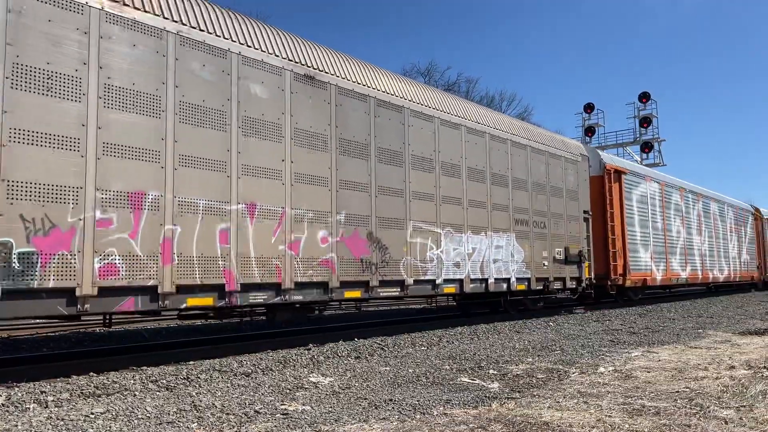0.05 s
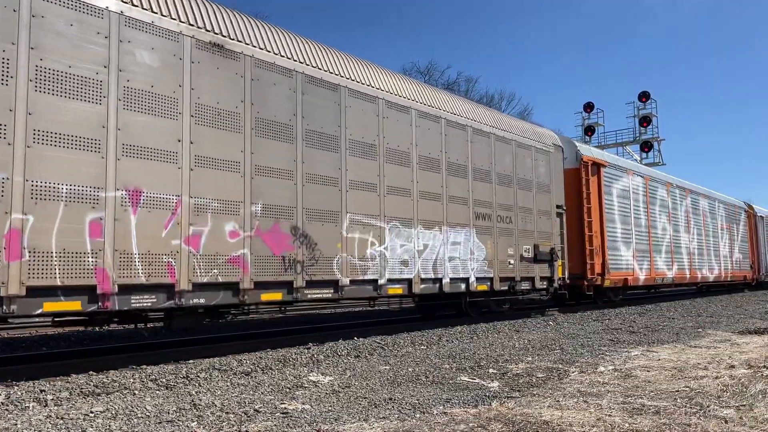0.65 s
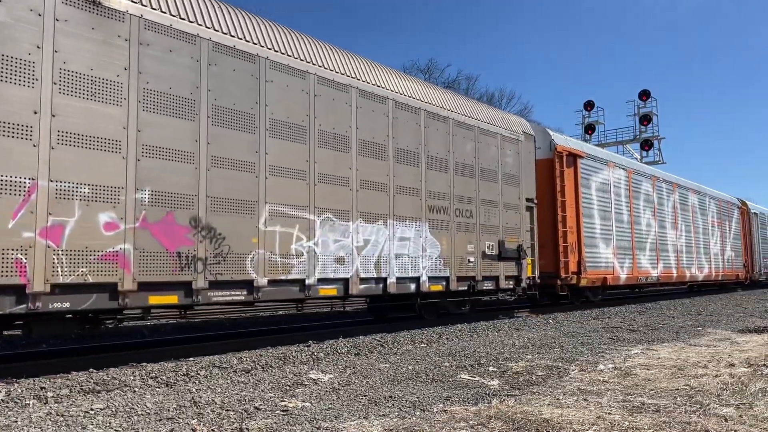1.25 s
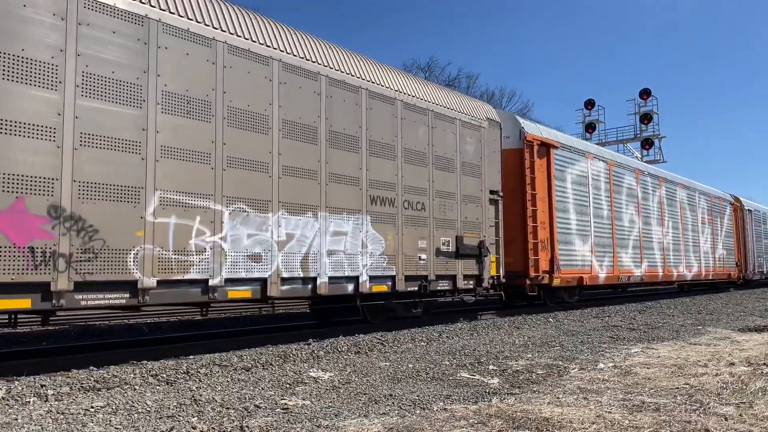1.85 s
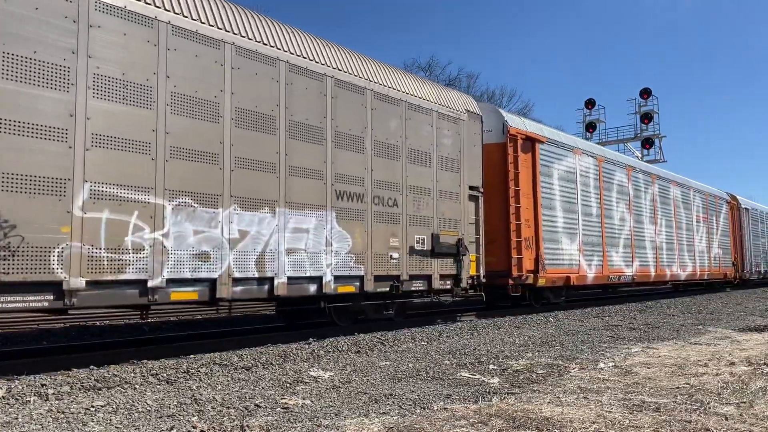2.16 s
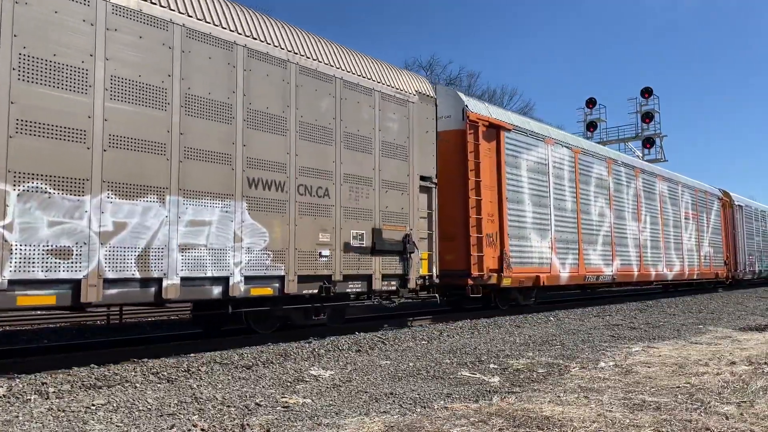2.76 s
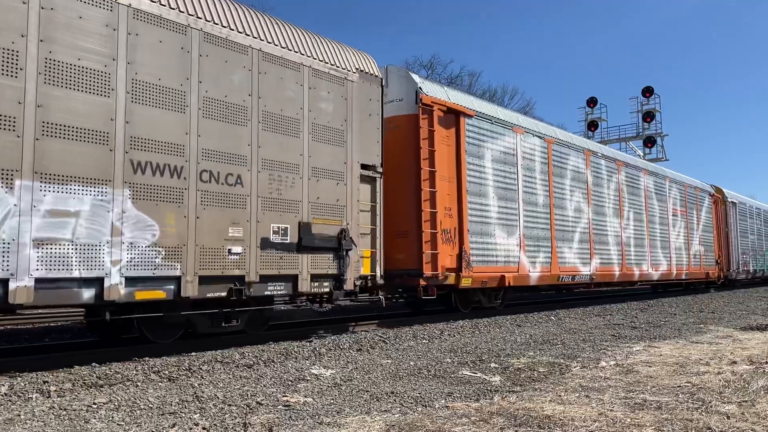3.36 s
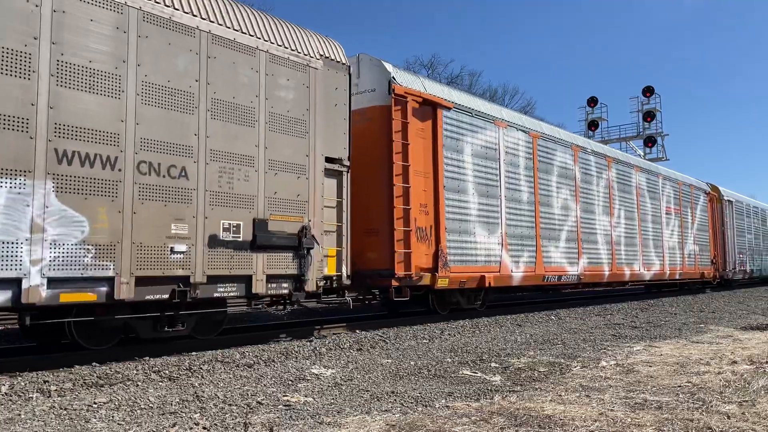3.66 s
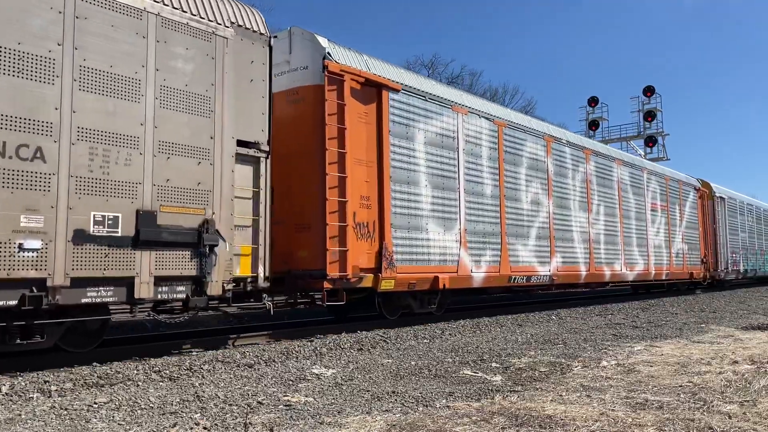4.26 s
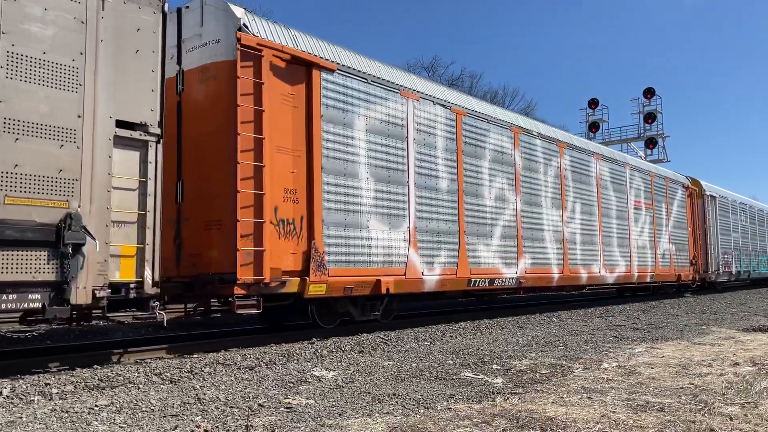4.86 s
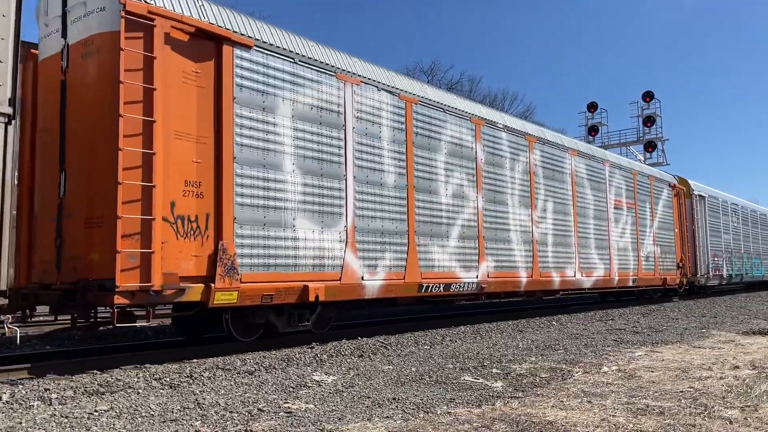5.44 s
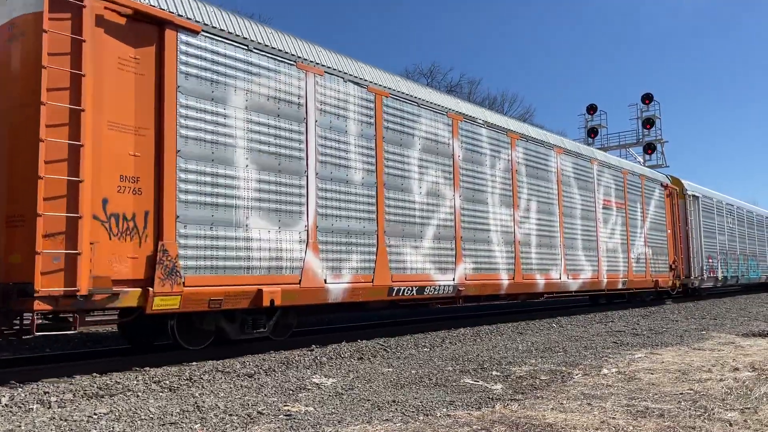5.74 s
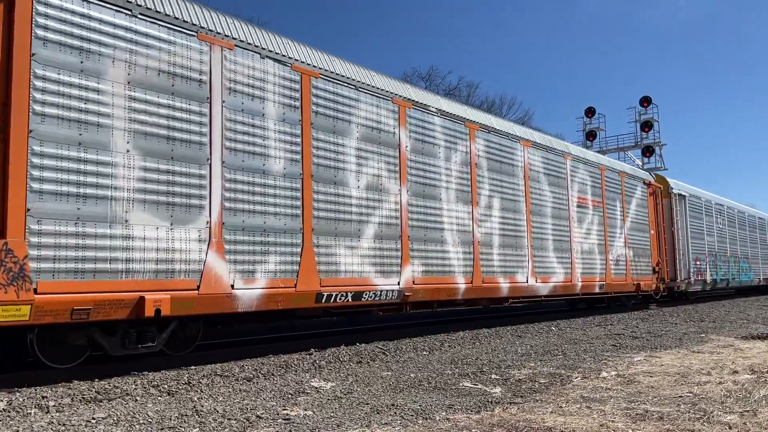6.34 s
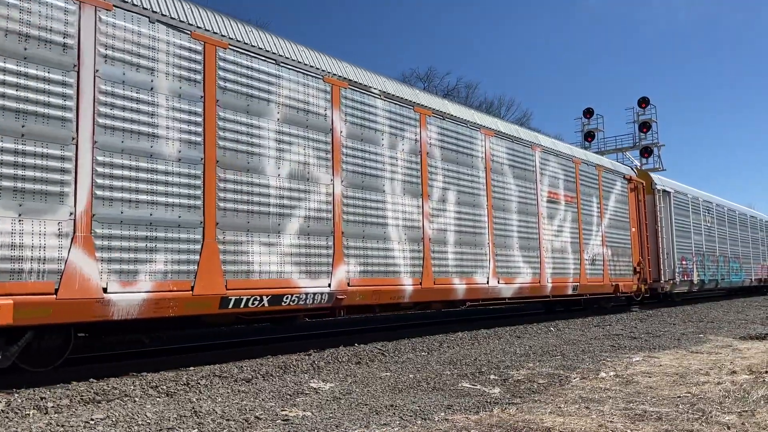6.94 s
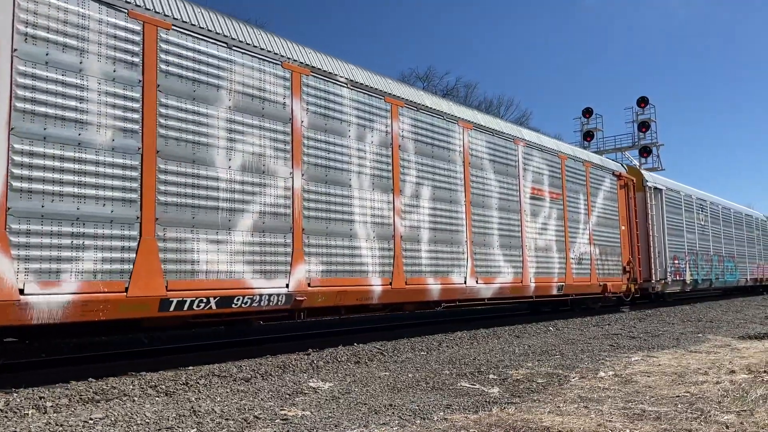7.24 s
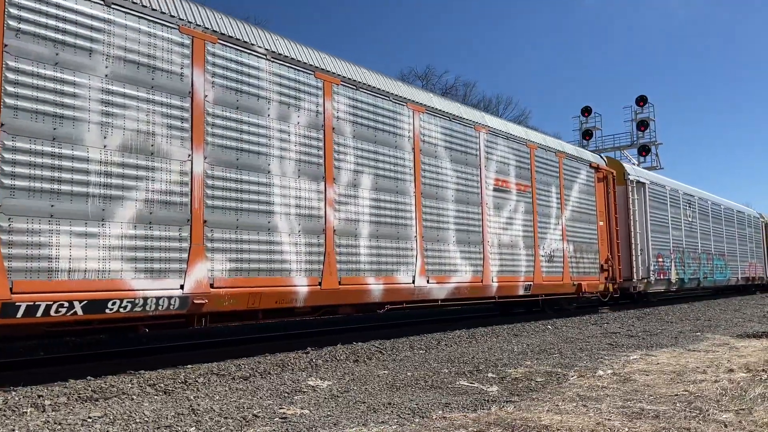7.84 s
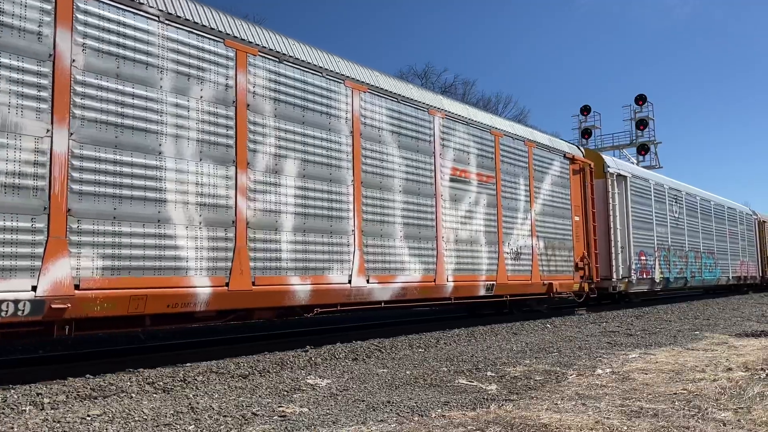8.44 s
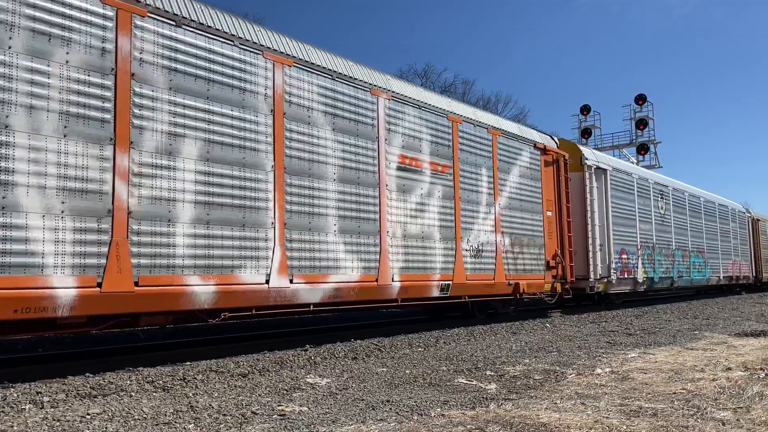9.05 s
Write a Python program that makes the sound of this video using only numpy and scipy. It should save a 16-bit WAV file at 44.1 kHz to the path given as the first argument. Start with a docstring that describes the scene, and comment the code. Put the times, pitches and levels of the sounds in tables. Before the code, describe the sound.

Heard in stereo from the trackside, a slow freight train keeps up a deep, steady rumble. A set of steel wheels passes at once with a hissing roar and ringing clanks on a rail joint. The sound eases to rumble, faint ticks, short squeaks and distant grinding. Past the middle, and again near the end, more wheels swell close and strike the joint, with dull booms from the wagon panels.

```python
"""A freight train of tall car carriers rolls slowly past, a few metres from a phone beside the ballast.
Wagon bodies rumble throughout. A bogie roars and hisses by at once; its wheels clank over a rail joint
and ring. Loose fittings tick, flanges chirp on the rail, panels boom. From 2 to 5 s wheels grind further
up the track. More wheels hit the joint from 5.5 s and from 8 s, as further bogies come abreast.
The train is heard from one side, in stereo."""
import sys
import numpy as np
from scipy import signal
from scipy.fft import rfft, irfft, next_fast_len
from scipy.io import wavfile

SR = 44100
rng = np.random.default_rng(int(sys.argv[2]) if len(sys.argv) > 2 else 0)


def store_pcm(level_fs):
    """Save levels as 16-bit WAV."""
    pcm = np.round(np.clip(level_fs, -1, 1) * 32767).astype(np.int16)
    wavfile.write(sys.argv[1], SR, np.atleast_2d(pcm).T)


N = 405719
TIME = np.arange(N) / SR
FFT_SIZE = next_fast_len(N + 8192)
FREQ = np.arange(FFT_SIZE // 2 + 1) * SR / FFT_SIZE
DIRECT_ONLY = np.array([[1], [0]])  # signal rows: direct, scattered

# noise spectra: (frequency [Hz], relative density [dB])
RUMBLE_SPECTRUM = [(18, -38), (30, -18), (45, -4.5), (62, 1.5), (100, -1.5), (150, -12.5), (260, -19),
                   (600, -86)]
DRONE_SPECTRUM = [(80, -4.5), (130, 5), (190, 2), (245, 4), (310, 3), (380, 1), (500, -8.5), (900, -55)]
ROAR_SPECTRUM = [(220, -5), (420, 1.5), (600, 2.5), (850, -1), (1200, -4), (1650, -13.5), (2300, -17.5),
                 (5000, -43.5)]
HISS_SPECTRUM = [(900, 0), (1500, 2), (1950, 3), (2450, -2.5), (2950, -3.5), (4000, -7), (5300, -7.5),
                 (6700, -12), (8500, -65), (11000, -60)]
SIZZLE_SPECTRUM = [(4000, 5.5), (7000, -2), (9000, 7.5), (10500, 1.5), (12000, -2.5), (15500, -38)]
CLANK_SPECTRUM = [(300, -11), (600, 10), (900, 5), (1400, -4.5), (1850, 7), (2450, 0), (3000, -2.5),
                  (4200, -10.5), (6500, -24), (10500, -17), (14000, -48)]
THUD_SPECTRUM = [(22, -20), (44, 3), (90, -28), (170, 3), (290, 6.5), (380, 4), (550, -7.5), (1000, -41),
                 (2500, -39.5)]
GRIND_SPECTRUM = [(300, 1), (800, 6.5), (1300, 2), (1900, -5), (3000, -13), (5500, -19.5), (8000, -75)]
# wagon body envelopes: (time [s], base level [dB])
RUMBLE_ENVELOPE = [(0.0, -24.5), (1.33, -29), (1.69, -26), (2.1, -32.5), (2.64, -28.5), (4.25, -30),
                   (4.61, -32.5), (5.71, -28.5), (7.3, -27.5), (7.53, -29.5), (8.84, -25.5), (9.2, -24)]
DRONE_ENVELOPE = [(1.1, -31), (1.7, -27), (3.3, -29), (3.8, -31), (7.5, -30.5)]
# passing bogies: (time abreast [s], level [dB], singing gain [dB])
BOGIE_PASSES = [(0.148, -2.44, -4), (6.27, -0.5, -3), (8.872, -2.5, -1.5)]
# near wheels on rough rail: (centre [s], length [s], roar gain [dB], hiss gain [dB])
ROUGH_SURGES = [(0.24, 0.22, 3, 4), (0.705, 0.38, 4, 6), (1.868, 0.28, 0.5, 2), (5.612, 0.29, 4.5, 6),
                (6.178, 0.16, 4, 6), (6.592, 0.081, 2, 6), (8.322, 0.41, 8.5, 7), (8.763, 0.23, 8, 5.5),
                (9.184, 0.4, 5, 2.5)]
# wheel on rail; loaded bogie frame: (frequency [Hz], relative level [dB], t60 [s])
WHEEL_MODES = [(1774, 3.5, 0.13), (1930, -8, 0.15), (2223, 2, 0.052), (2408, 4.5, .25), (2515, 4.5, 0.25),
               (2632, 1, 0.1), (3216, -6, 0.28), (3380, -4.5, 0.4), (3524, -0.5, 0.13), (4200, -2, 0.2),
               (5030, -9, 0.4), (5850, -10, 0.22)]
BOGIE_MODES = [(89.5, -2, 0.11), (153, -12, 0.23), (264, 5, 0.1), (365, 1, 0.11), (433, 1, 0.025),
               (720, -13, 0.045), (1094, -6, 0.053)]
# wheels hitting the joint, base levels: (time [s], clank [dB], thud [dB], crack [dB], crack pitch [Hz])
JOINT_HITS = [(0.0204, -15, -11.5, -4, 2120), (0.5007, -20.5, -13, -13, 2420),
              (5.514, -15, -13, -9.5, 2110), (5.989, -24, -20, -21, 2100), (6.033, -16.5, -13, -9, 2150),
              (6.510, -24.5, -14, -18, 2430), (8.060, -14.5, -12.5, -12, 2000),
              (8.5758, -14, -12.5, -7, 2250), (9.05, -28, -26, -17.5, 2430)]
# worn wheels, one mode list per hit: (frequency [Hz], level [dB], t60 [s])
WORN_WHEEL_MODES = [
    [(1760, -25, .13), (2460, -29.5, 0.59), (3220, -33, 0.3), (3290, -36, 0.31), (4100, -34, 0.3)],
    [(2410, -33, 0.61), (3370, -38, .2)],
    [(1830, -19, 0.078), (2705, -37, .13), (3520, -25, 0.16), (4200, -40, 0.74), (5220, -31.5, 0.43)],
    [(3520, -45, .2)],
    [(1980, -24, 0.15), (2517, -20.5, 0.12), (3160, -33, 0.24), (4460, -28, 0.12), (5140, -34, .1),
     (5300, -34, 0.4)],
    [(1900, -35, .08), (2440, -17.5, 0.052)],
    [(1790, -33, .14), (2718, -32, 0.14), (3300, -40, 0.18), (5070, -41, 0.22)],
    [(1830, -24, .09), (2450, -14, 0.066), (3960, -33, .18), (5030, -41, .2), (5230, -31, 0.52),
     (5900, -42, 0.35)],
    [(1810, -28, .1), (2500, -29, .12)],
]
# loudest fitting ticks: (time [s], level [dB], pitch [Hz])
LOUD_TICKS = [(0.19, -34.5, 3770), (2.017, -53, 8800), (2.365, -46, 3400), (2.847, -41, 1900),
              (2.93, -43, 1850), (3.27, -47, 9450), (3.345, -50, 9500), (4.32, -48, 4850),
              (7.246, -45.5, 7760), (7.478, -44, 3400)]
# flange chirps; panel booms: (centre [s], length [s], pitch [Hz], level [dB])
FLANGE_CHIRPS = [(0.327, 0.04, 2180, -33), (0.885, 0.033, 2160, -39.5), (1.497, .087, 2170, -49.5),
                 (1.825, 0.085, 2125, -41.5), (2.318, 0.085, 2100, -41.5), (2.765, 0.027, 4660, -60),
                 (3.37, 0.061, 2140, -44.5), (3.5, 0.07, 2160, -46.5), (3.78, 0.06, 2130, -47),
                 (5.655, .04, 2145, -37), (5.722, 0.032, 2130, -36), (5.853, 0.025, 2160, -39.5),
                 (6.56, 0.024, 2160, -28), (6.616, 0.035, 2110, -31.5), (6.67, .03, 2180, -35),
                 (6.8, 0.11, 2140, -41), (6.97, .05, 2070, -43), (7.071, 0.032, 2150, -34),
                 (7.154, 0.07, 2180, -42)]
PANEL_BOOMS = [(0.78, 0.1, 68.6, -25), (1.837, 0.066, 55.2, -11.5), (2.57, 0.47, 101.7, -27.5),
               (2.493, 0.45, 235, -31), (3.37, 0.15, 53.3, -25.5), (3.818, .12, 56.6, -21.5),
               (5.662, 0.14, 52, -21.5), (6.21, 0.55, 59.6, -29), (8.132, 0.14, 168.8, -24.5),
               (8.586, 0.044, 66.5, -16)]
# far wheels on rough rail: (centre [s], length [s], level [dB])
FAR_GRINDS = [(2.40, 0.25, -38), (2.924, 0.19, -36), (3.88, .09, -40.5), (4.46, 0.21, -37),
              (4.99, 0.47, -41)]
# stereo image: (frequency [Hz], left lead [rad], coherence [0-1], left minus right [dB])
# left and right in opposite phase at 7-8 kHz and above 13 kHz, thinning the centre
STEREO_IMAGE = [(50, .1, .98, .3), (130, .25, .95, .8), (280, .62, .91, 1.8), (550, 1.08, .73, 2.7),
                (1100, 1.2, .6, 3.8), (1450, 2.9, .42, .8), (1800, 5.2, .72, -4.4), (2300, 6.4, .92, .8),
                (2900, 7.3, .74, 4.7), (4700, 6.15, .48, 1), (5500, 5.9, .6, -.5), (7050, 3.2, .99, 0),
                (8050, 3.1, .99, 0), (8800, 2, .7, 0), (10300, .1, .96, 0), (11900, -.1, .9, 0),
                (13100, -3.14, .99, 0)]


def undb(db):
    """Decibels to gain."""
    return 10 ** (np.asarray(db) / 20)


def over_time(rows):
    """Table columns interpolated over time."""
    times_s, *columns = np.transpose(rows)
    return [np.interp(TIME, times_s, c) for c in columns]


def over_freq(rows):
    """Table columns interpolated over log frequency."""
    hz, *columns = np.transpose(rows)
    return [np.interp(np.log(FREQ + 1), np.log(hz), c) for c in columns]


def noise():
    """Independent white noises: direct, scattered."""
    return rng.standard_normal((2, N))


def shape(x, gain):
    """Filter by a gain per frequency, keeping white-noise power."""
    rms_gain = np.sqrt(np.mean(np.abs(gain) ** 2))
    return irfft(rfft(x, FFT_SIZE) * gain / rms_gain, FFT_SIZE)[..., :N]


def colour(x, spectrum):
    """Filter by a spectrum table."""
    return shape(x, undb(over_freq(spectrum)[0]))


def resonance(hz, width_hz):
    """Band-pass response, 1 at centre."""
    return 1j * FREQ * width_hz / (hz ** 2 - FREQ ** 2 + 1j * FREQ * width_hz)


def walk(rate_hz):
    """Random wander, unit spread."""
    knots = rng.standard_normal(4096)
    return np.interp(TIME * rate_hz, np.arange(len(knots)), knots) * np.sqrt(3 / 2)


def swell(centre_s, length_s):
    """Bell-shaped envelope."""
    return np.exp(-2 * np.minimum(((TIME - centre_s) / length_s) ** 2, 20))


def decay(start_s, t60_s, rise_s):
    """Impact envelope: quick rise, exponential fall."""
    age_s = np.clip(TIME - start_s, 0, 2 * t60_s)
    return (1 - np.exp(-age_s / rise_s)) * np.exp(-np.log(1000) * age_s / t60_s)


def grit(rate_hz, spread_db):
    """Tiny random impacts of rough steel on steel, unit RMS."""
    size = undb(spread_db * np.minimum(rng.exponential(size=N), 5))
    impacts = noise() * size * (rng.random(N) < rate_hz / SR)
    return impacts / impacts.std()


def passing(far_db, near_db, pass_s=0.42):
    """Gain of distant wheels plus near bogies, each 6 dB down at pass_s from abreast."""
    nearness = sum(undb(db) ** 2 / (1 + ((TIME - abreast_s) / pass_s) ** 2) ** 2
                   for abreast_s, db, _ in BOGIE_PASSES)
    return np.sqrt(undb(far_db) ** 2 + undb(near_db) ** 2 * nearness)


def wheel_response(blur):
    """Wheel modes as a filter; turning and load widen each by blur times its pitch."""
    return sum(undb(db) * resonance(hz, 3.2 / t60_s + hz * blur) for hz, db, t60_s in WHEEL_MODES)


def wagon_bodies(surge_db):
    """Shaken bodies rumble; their sides drone, louder over a near bogie."""
    rumble = colour(noise(), RUMBLE_SPECTRUM) * undb(over_time(RUMBLE_ENVELOPE)[0] + 2.5)
    drone = colour(noise(), DRONE_SPECTRUM) * passing(over_time(DRONE_ENVELOPE)[0], near_db=-23.5)
    return rumble + drone * undb(0.73 * surge_db)


def treads(roar_db, hiss_db, hiss_gain, judder):
    """Rough treads on the rail roar, hiss and sizzle, flickering with the contact load."""
    roar = colour(grit(rate_hz=9000, spread_db=0.6), ROAR_SPECTRUM)
    roar *= passing(far_db=-35, near_db=-28) * undb(roar_db + 1.35 * judder)
    hiss = colour(grit(rate_hz=9000, spread_db=0), HISS_SPECTRUM) * hiss_gain * undb(1.2 * judder)
    sizzle = colour(grit(rate_hz=6700, spread_db=-3), SIZZLE_SPECTRUM)
    sizzle *= passing(far_db=-58.5, near_db=-48.5) * undb(1.4 * hiss_db + 1.6 * judder + 2 * walk(35))
    return roar + hiss + sizzle


def wheel_singing(drive, base_db=-40, growth=1.18):
    """Wheel discs sing as they come close, mostly in their low modes."""
    singing = shape(noise(), wheel_response(blur=0.0063) * resonance(2480, 1240))
    return singing * undb(base_db + over_time(BOGIE_PASSES)[1]) * drive ** growth


def far_rails():
    """The rest of the train keeps the rails sounding."""
    return shape(noise(), resonance(1400, 410) ** 2) * undb(-49.5 + 2.4 * walk(9))


def rolling(turn_s=1.02, crest_s=2.85, hiss_near_db=-35):
    """Rolling noise: a strong and a weak throb per wheel turn, surges on rough rail."""
    turn_rad = 2 * np.pi * (TIME - crest_s) / turn_s
    throb_db = 0.46 * np.cos(turn_rad) + 0.37 * np.cos(2 * turn_rad)
    roar_db = throb_db + sum(db * swell(at_s, length_s) for at_s, length_s, db, _ in ROUGH_SURGES)
    hiss_db = throb_db + sum(db * swell(at_s, length_s) for at_s, length_s, _, db in ROUGH_SURGES)
    hiss_gain = passing(far_db=-45.5, near_db=hiss_near_db) * undb(hiss_db)
    judder = walk(14)  # contact load
    return (wagon_bodies(roar_db) + treads(roar_db, hiss_db, hiss_gain, judder)
            + wheel_singing(drive=hiss_gain / undb(hiss_near_db)) + far_rails())


def struck(modes, start_s, rise_s, tuning=1, waver=0.0023):
    """Struck steel: modes build up, waver with the rolling load and die away."""
    hz, db, t60_s = np.transpose(modes)[:, :, None]
    phase_cycles = rng.random((len(modes), 1))
    age_s = np.arange(SR // 2) / SR
    cycles = hz * tuning * np.cumsum(1 + waver * walk(103)[:len(age_s)]) / SR
    partials = undb(db) * np.exp(2j * np.pi * (cycles + phase_cycles) - np.log(1000) * age_s / t60_s)
    ring = partials.sum(0) * (1 - np.exp(-age_s / rise_s))
    ring = np.pad(ring, (int(start_s * SR), N))[:N]
    return np.array([ring.real, ring.imag])


def rail_joint(bounce_lag_s=0.0059, thud_lag_s=0.00528, chatter=0.29):
    """A wheel drops on the rail end: crack, clank, a second blow just after, bogie thud, ringing."""
    crack = blow = shudder = ring = 0
    for (start_s, clank_db, thud_db, crack_db, crack_hz), modes in zip(JOINT_HITS, WORN_WHEEL_MODES):
        crack_tone = np.sin(2 * np.pi * crack_hz * (TIME - start_s))
        crack += undb(crack_db) * decay(start_s, t60_s=0.0084, rise_s=0.00023) * crack_tone
        bounce = 0.23 * decay(start_s + bounce_lag_s, t60_s=0.39, rise_s=0.00071)
        blow += undb(clank_db) * (decay(start_s, t60_s=0.057, rise_s=0.0008) + bounce)
        thud_s = start_s + thud_lag_s
        shudder += undb(thud_db - 1.5) * decay(thud_s, t60_s=0.32, rise_s=0.0012)
        ring += struck(modes, start_s, rise_s=0.0032) * (1 + chatter * walk(170))
        load_tuning = 1 + 0.033 * rng.standard_normal((len(BOGIE_MODES), 1))
        ring += undb(thud_db - 2.3) * struck(BOGIE_MODES, thud_s, rise_s=0.0097, tuning=load_tuning)
    clank = undb(-3) * colour(noise() * blow, CLANK_SPECTRUM)
    clank += undb(-9) * shape(noise() * blow, wheel_response(blur=0.012))
    thud = colour(noise() * shudder, THUD_SPECTRUM)
    return crack * DIRECT_ONLY + clank + thud + ring


def fittings(light_count=44, light_db=-55, spread_db=4, light_hz=4800, spread_oct=0.58):
    """Chains, latches and side panels tick as the wagons sway; light ticks fall at random."""
    light_ticks = [(when * N / SR,
                    light_db + spread_db * (2 * size - 1),
                    light_hz * 2 ** (spread_oct * (2 * pitch - 1)))
                   for when, size, pitch in rng.random((light_count, 3))]
    ticks, rattle = 0, noise()
    for start_s, db, hz in list(LOUD_TICKS) + light_ticks:
        band = signal.butter(2, [hz / 1.3, min(hz * 1.3, 0.45 * SR)], "band", fs=SR)
        burst = rattle * (decay(start_s, t60_s=0.12, rise_s=0.0003) + 1e-18)
        ticks += undb(db) * np.sqrt(SR / hz) * signal.lfilter(*band, burst)
    return ticks


def flanges(scrape_db=-47, squeal_db=-27, waver=0.0032, stutter_db=1.0):
    """Flanges stick and slip on the rail: a light touch scrapes, a firm one holds a tone."""
    clock_s = np.cumsum(1 + waver * walk(160)) / SR
    scrape = (walk(170) + 1j * walk(170)) / np.sqrt(2)
    chirps = 0
    for centre_s, length_s, hz, db in FLANGE_CHIRPS:
        grip = np.clip((db - scrape_db) / (squeal_db - scrape_db), 0, 0.9)
        tone = np.exp(2j * np.pi * hz * clock_s) * (np.sqrt(grip) + np.sqrt(1 - grip) * scrape)
        chirps += undb(db) * swell(centre_s, length_s) * np.sqrt(2) * tone.real
    return chirps * undb(stutter_db * walk(38)) * DIRECT_ONLY


def panels(width_hz=22):
    """Floors and side panels boom at their own pitch as a wagon flexes."""
    return sum(undb(db) * swell(centre_s, length_s) * shape(noise(), resonance(hz, width_hz) ** 2)
               for centre_s, length_s, hz, db in PANEL_BOOMS)


def grinding(judder_db=1.4):
    """Far wheels grind over rough rail; from straight ahead, so alike left and right."""
    envelope = sum(undb(db) * swell(centre_s, length_s) for centre_s, length_s, db in FAR_GRINDS)
    grind = colour(grit(rate_hz=2400, spread_db=0.5)[0], GRIND_SPECTRUM)
    return grind * envelope * undb(judder_db * walk(40))


def stereo_image(sound):
    """Left and right differ in phase and level by frequency; scattered sound decorrelates them."""
    lead_rad, coherence, pan_db = over_freq(STEREO_IMAGE)
    direct, scattered = rfft(sound, FFT_SIZE)
    side = np.array([[1], [-1]])  # left, right
    pair = np.sqrt((1 + coherence) / 2) * direct + side * np.sqrt((1 - coherence) / 2) * scattered
    return irfft(pair * np.exp(0.5j * side * lead_rad) * undb(side * pan_db / 2), FFT_SIZE)[:, :N]


def scene():
    """The train from trackside."""
    return stereo_image(rolling() + rail_joint() + fittings() + flanges() + panels()) + grinding()


def record(dry):
    """Low-pass at 15750 Hz."""
    return signal.sosfilt(signal.ellip(10, 0.2, 80, 15750, fs=SR, output="sos"), dry)


dry = scene()
out = record(dry)
store_pcm(out)
```